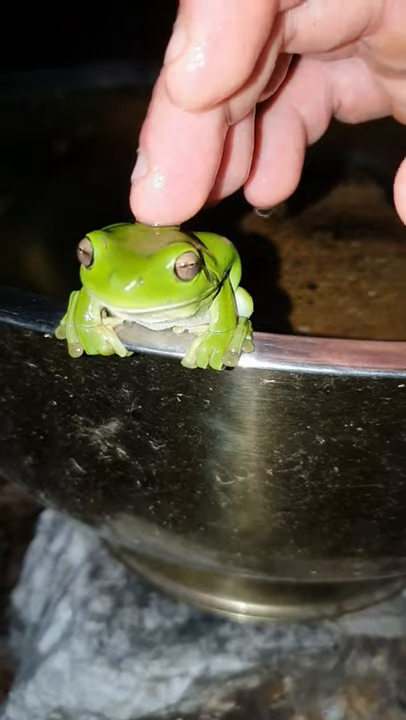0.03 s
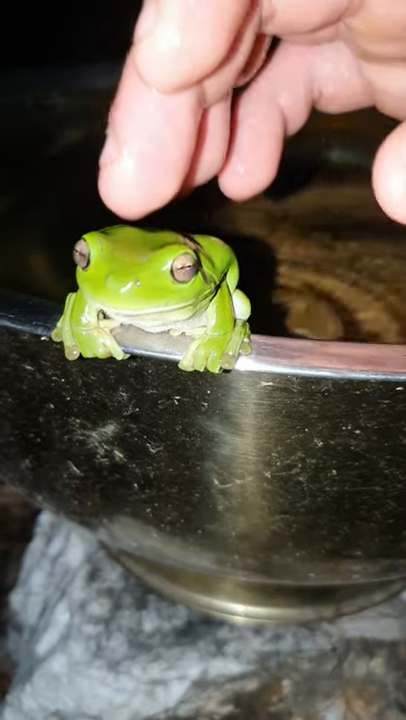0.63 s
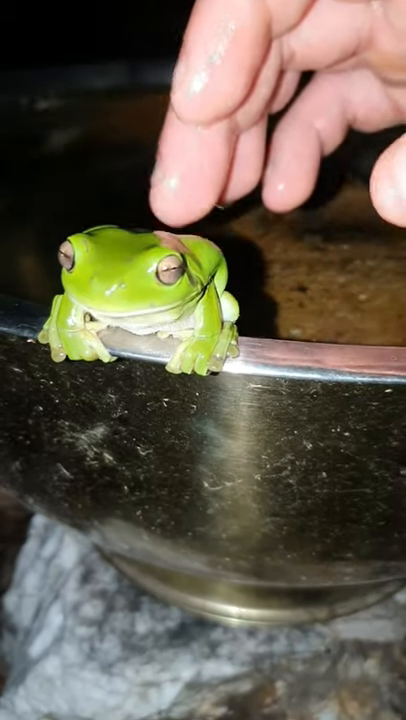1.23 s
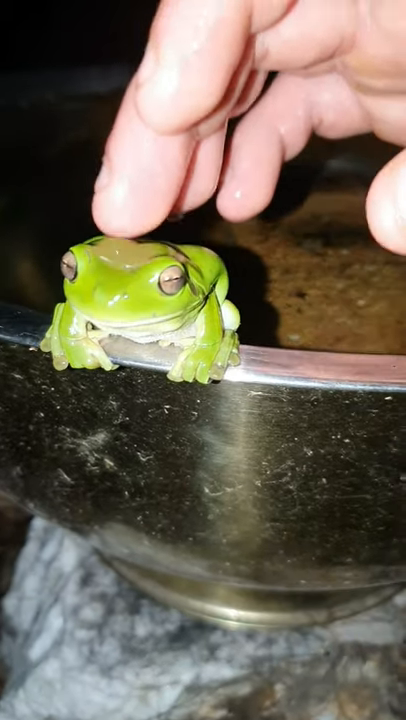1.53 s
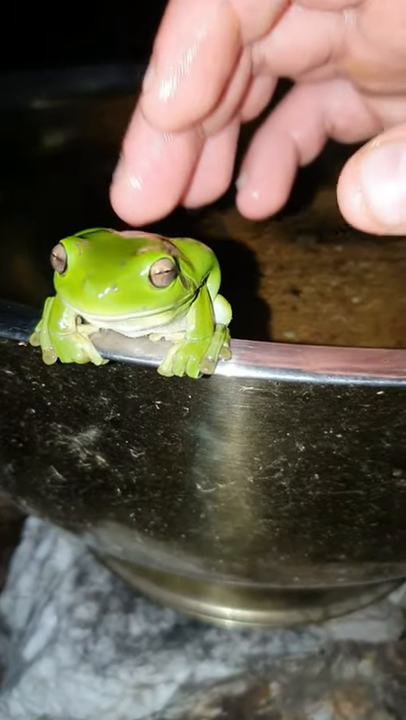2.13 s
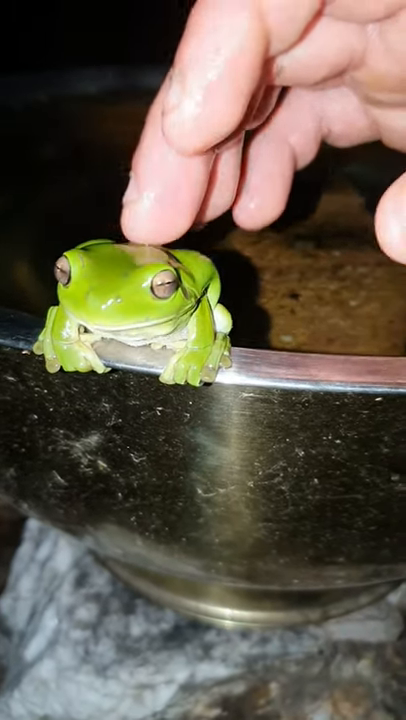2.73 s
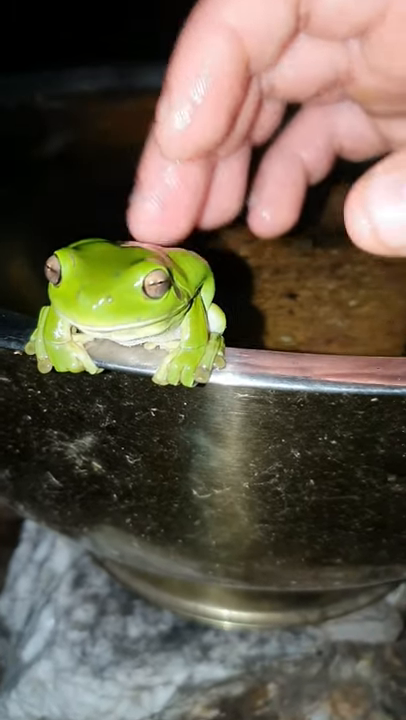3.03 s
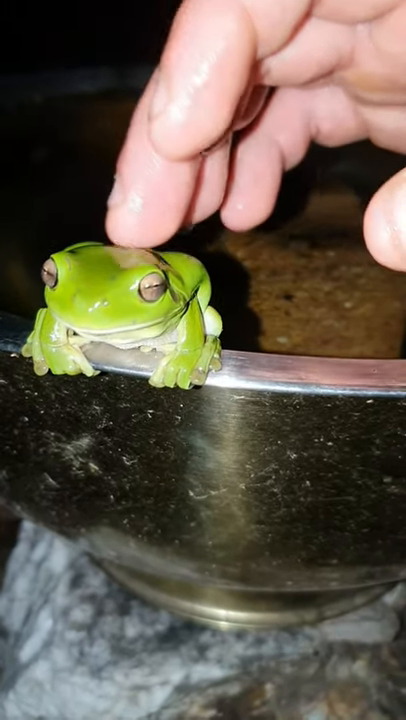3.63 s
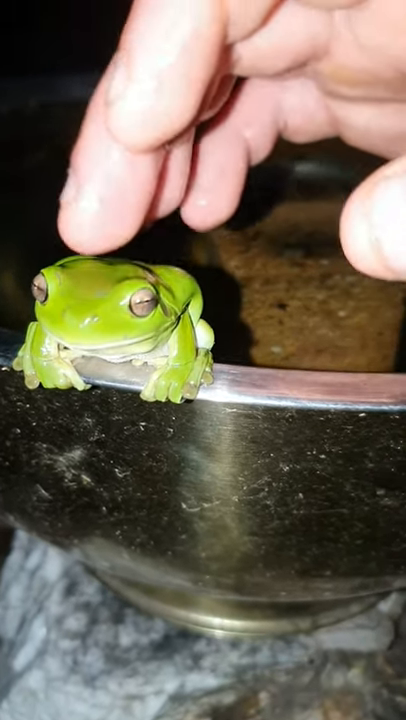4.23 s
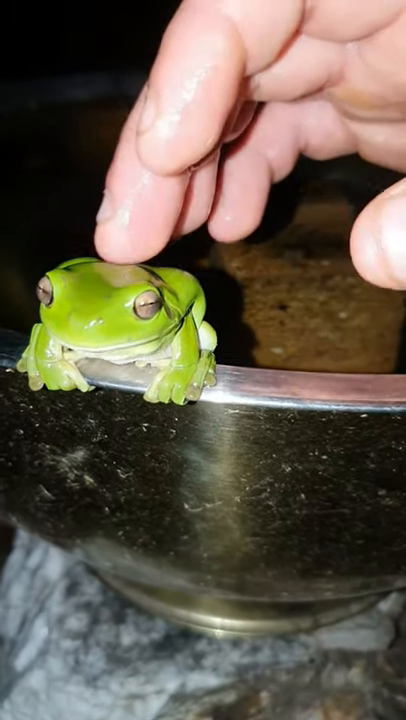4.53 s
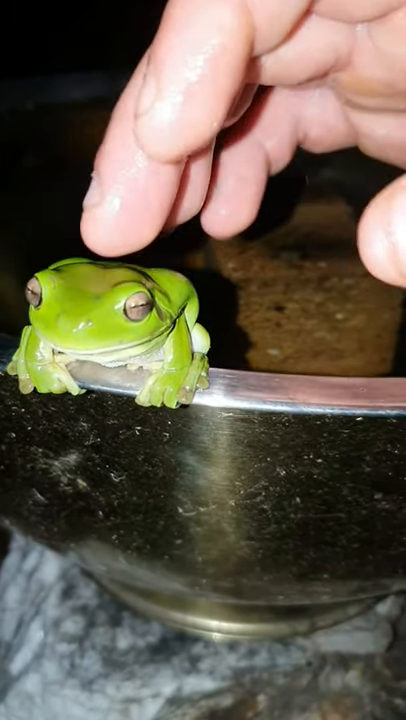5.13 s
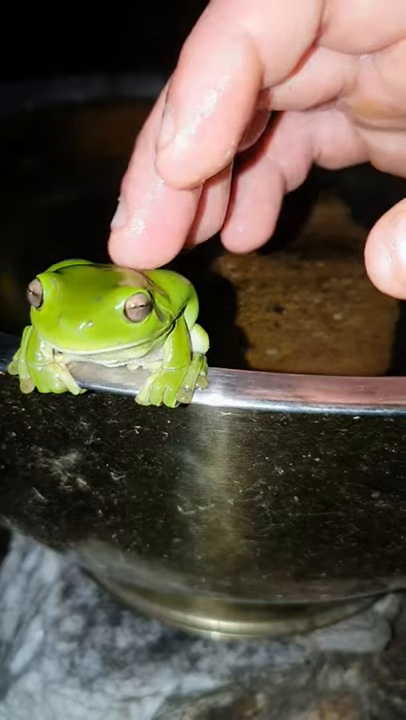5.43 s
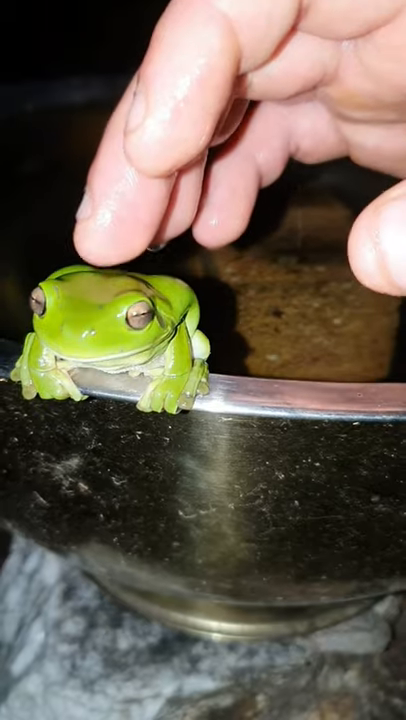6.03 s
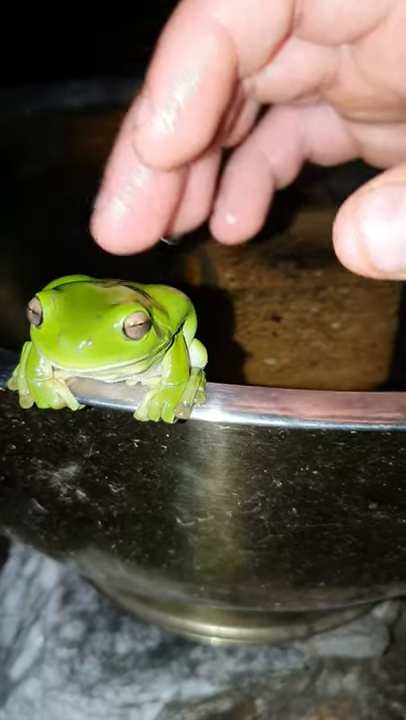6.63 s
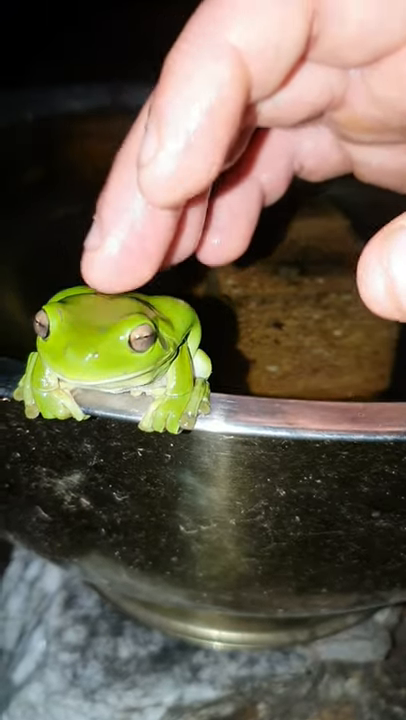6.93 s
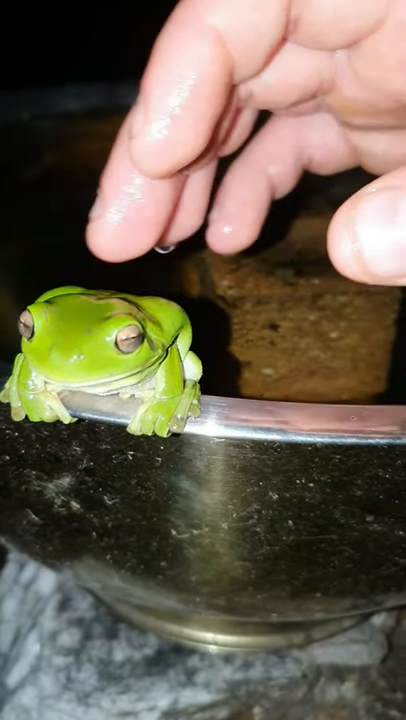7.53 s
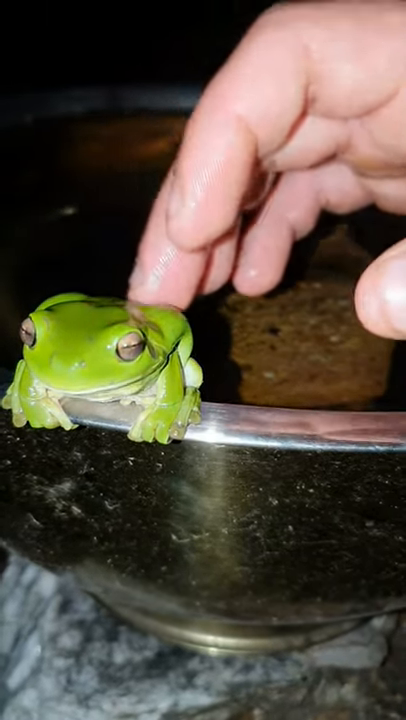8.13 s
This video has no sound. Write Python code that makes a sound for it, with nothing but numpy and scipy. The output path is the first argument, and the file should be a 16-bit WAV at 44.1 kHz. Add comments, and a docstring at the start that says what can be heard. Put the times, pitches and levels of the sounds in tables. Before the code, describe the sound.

Night crickets and a far insect chorus, with a distant machine's low rumble, dull microphone thuds and one brief wet swish.

```python
"""Field crickets chirp in a garden at night, each wing scrape making one tiny falling note.
A mole cricket churrs from its burrow and pauses once, and small crickets trill high above it.
Behind them are a far insect chorus, night air, a far road and a machine's hum and low rumble.
A hand bumps the microphone, shifts its grip, brushes lightly and makes one squeaky swish."""
import sys
import numpy as np
from scipy import signal
from scipy.fft import rfft, irfft
from scipy.io import wavfile

SR = 44100
rng = np.random.default_rng(int(sys.argv[2]) if len(sys.argv) > 2 else 0)


def to_wav(s):
    """Save 16-bit WAV."""
    ch = np.atleast_2d(s).T  # columns
    pcm = np.round(np.clip(ch, -1, 1) * 32767)  # PCM
    wavfile.write(sys.argv[1], SR, pcm.astype(np.int16))


N = 365588
T = np.arange(N) / SR
FREQS = np.fft.rfftfreq(N, 1 / SR)

# the tone of the far insect chorus: (frequency [Hz], relative level [dB])
CHORUS_TONE = [(3300, -15.5), (3600, -11), (3820, -2.5), (4150, 2.5), (4550, -0.5), (4750, -12),
               (5100, -15.5), (6500, -45.5), (7700, -23.5), (8200, -11.5), (8600, -16.5), (9200, -13),
               (9950, -14), (10300, -36), (12000, -35)]
# the tone of the night air: (frequency [Hz], relative level [dB])
AIR_TONE = [(250, 0), (450, 5.5), (600, -5), (780, -1), (1120, -5.5), (1350, -6), (2000, -2), (2270, -10),
            (2550, -6), (3200, -21), (6000, -21.5), (11000, -17.5), (12500, -28), (15000, -27)]
# the tone of the far road: (frequency [Hz], relative level [dB])
ROAD_TONE = [(580, -10.5), (720, -2), (850, -1.5), (1120, 0.5), (1350, -11), (1800, -13.5)]
# the road grows louder, unevenly: (time [s], level [dB])
ROAD_LOUDNESS = [(0, -85), (1.1, -72.5), (2.15, -74), (2.45, -70.5), (3.5, -68.5), (4, -72.5), (6.2, -68.5),
                 (6.9, -69), (7.35, -64.5), (7.7, -66.5), (7.9, -70), (8.29, -67)]
# the notes in the machine's hum: (pitch [Hz], level [dB])
HUM_NOTES = [(76.7, -51), (153.4, -67), (230.3, -68.5), (307.2, -76)]
# the hum's upper notes swell: (peak time [s], pitch [Hz], level [dB], half length [s])
OVERTONE_SWELLS = [(1.6, 307.2, -71, 0.3), (2.552, 234.1, -54, .11), (3.555, 307.2, -62.5, 0.32),
                   (6.3, 307.2, -66, 0.39), (6.96, 230, -59, 0.16)]
# the tone of the machine's rumble: (frequency [Hz], relative level [dB])
RUMBLE_TONE = [(12, -37), (20, -32.5), (60, -0.5), (81, 1), (112, -4), (177, -15.5), (237, -17.5),
               (279, -22.5), (313, -27), (360, -35.5), (420, -54), (550, -73), (920, -120)]
# how loud the rumble is: (time [s], level [dB])
RUMBLE_LOUDNESS = [(0, -43), (.8, -43), (1.05, -44.5), (1.55, -42), (1.85, -41), (2.02, -46.5), (2.25, -41),
                   (4.1, -43), (4.6, -43), (5.2, -44), (5.65, -41), (6.5, -43.5), (8.29, -42)]
# when the mole cricket sings: (start [s], end [s])
MOLE_PHRASES = [(0, 6.31), (7.25, 8.29)]
# how fast its wings move: (time [s], pace [strokes/s])
MOLE_PACE = [(0, 98), (1, 98.1), (2.5, 97.7), (4.8, 97.9), (6.3, 98.4), (8.29, 98.1)]
# how hard it sings: (time [s], level change [dB])
MOLE_EFFORT = [(0, -0.5), (1.6, 0), (2.6, 1.5), (3.5, 0.5), (3.9, -1.5), (6.3, 0), (7.3, -2.5), (7.8, 0.5),
               (8.29, -2)]
# its main note flares briefly: (time [s], boost [dB])
MOLE_FLARES = [(2.66, 8), (4.47, 4), (4.65, 6), (4.77, 8), (7.76, 4), (7.88, 8)]
# one high cricket's swelling trills: (start [s], end [s], relative full level [dB])
SWELLING_TRILLS = [(-2.5, 0.21, -76), (0.4, 2.26, -76), (2.5, 4.44, -75.5), (4.5, 6.6, -76.5), (7, 9, -76)]
# a second high cricket's short trills: (start [s], end [s])
SHORT_TRILLS = [(1.2, 1.65), (3.2, 3.8), (5.3, 5.3), (7.15, 7.5)]
# far crickets: (pitch [Hz], pace [strokes/s], level [dB], left minus right [dB])
FAR_CRICKETS = [(8800, 52, -84.5, -3), (9210, 118, -86, 3), (9300, 112, -88, 2)]
# the slow field cricket's chirps: (start [s], wing strokes [count], relative level [dB])
SLOW_SONG = [(.105, 7, -56.5), (.768, 7, -57), (1.381, 7, -56.5), (2.036, 7, -57), (2.754, 6, -56),
             (3.323, 7, -56.5), (4.042, 8, -58.5), (4.703, 10, -59.5), (5.417, 7, -58.5), (6.074, 7, -58),
             (6.751, 6, -58), (7.369, 7, -59), (8.114, 5, -56.5)]
# the quick field cricket's chirps: (start [s], relative level [dB])
QUICK_SONG = [(0.135, -58), (0.58, -59.5), (1.023, -56.5), (1.463, -58), (1.912, -57.5), (2.361, -56.5),
              (2.83, -56.5), (3.286, -55.5), (3.716, -58.5), (4.156, -59), (4.620, -58.5), (5.060, -57.5),
              (5.51, -60), (5.964, -58.5), (6.413, -58), (7.005, -59), (7.443, -57.5), (7.933, -59)]
# bumps on the left microphone opening: (time [s], level [dB], pitch [Hz])
MIC_BUMPS = [(0.774, -29.5, 62), (2.603, -21.5, 65), (2.81, -33, 62), (3.27, -26.5, 65),
             (3.51, -24.5, 79.6), (3.545, -17.5, 79.7), (3.715, -31, 60.1), (6.94, -31, 62)]
# light brushes of the hand: (peak time [s], level [dB], rise [s], fall [s],
# centre frequency [Hz], width [Hz], left minus right [dB])
HAND_BRUSHES = [(2.825, -69, 0.024, 0.024, 8900, 7000, -4), (4.82, -69.5, 0.018, .035, 3200, 2400, -4),
                (5.15, -76, .02, 0.062, 14000, 1800, 6), (5.715, -75.5, .018, .04, 13200, 3500, -5),
                (6.13, -76, 0.1, .08, 14300, 1400, 9), (6.275, -65, 0.074, .04, 13500, 2200, 6),
                (6.6, -74, .02, .04, 2500, 1000, -2), (6.85, -74, .02, .04, 2600, 1200, -2),
                (7.49, -72, 0.04, .05, 7500, 7000, -2), (7.738, -71, .012, 0.026, 13000, 3000, -4)]
# the tone of the swish: (frequency [Hz], relative level [dB])
SWISH_TONE = [(1500, -5), (2400, 0), (3100, -1.5), (4000, -1.5), (5000, -4.5), (6500, -2.5), (8600, -0.5),
              (12000, -4.5), (14500, -6.5)]


def undb(db):
    """Turn decibels into a number to multiply a sound by."""
    return 10 ** (np.asarray(db) / 20)


def unit(x):
    """Scale a signal so its average power is 1."""
    return x / np.sqrt(np.mean(x ** 2))


def curve(rows):
    """Join (time, value) points with straight lines."""
    return np.interp(T, *np.transpose(rows))


def held(start, end, rise_s, fall_s):
    """A loudness shape that rises to 1 at start, holds, and dies away after end."""
    return np.exp(-np.maximum(np.maximum((start - T) / rise_s, (T - end) / fall_s), 0))


def hill(peak_s, half_length_s):
    """A smooth rise and fall around one moment."""
    return np.exp(-((T - peak_s) / half_length_s) ** 2)


def pan(left_db):
    """Left and right gains that make the left side louder by left_db."""
    return undb(np.array([[left_db], [-left_db]]) / 2)


def wobble(rate):
    """A smooth random wobble of size about 1, changing about rate times a second."""
    return unit(irfft(rfft(rng.standard_normal(N)) * np.exp(-(FREQS / rate) ** 2), N))


def colour(points):
    """A gain for every frequency from (Hz, dB) points, fading out past both ends."""
    hz, db = np.transpose(points)
    edges = np.minimum(FREQS / hz[0], 1) ** 2 * np.minimum(hz[-1] / (FREQS + 1), 1) ** 4
    return undb(np.interp(np.log(FREQS + 1), np.log(hz), db)) * edges


def noise(gain, alike_hz=520):
    """Noise from all around; long waves, below alike_hz, reach both sides alike."""
    shared, apart = rfft(rng.standard_normal((2, N)))
    alike = 1 / (1 + (FREQS / alike_hz) ** 2)
    stereo = shared * np.sqrt(1 + alike) + np.array([[1], [-1]]) * apart * np.sqrt(1 - alike)
    return unit(irfft(gain * stereo, N))


def garden(x, echo_db, echo_s, left_db=0):
    """The direct sound plus echoes off leaves, ground and walls, which fade 60 dB in echo_s."""
    t = T[:SR // 2]
    echoes = rng.standard_normal((2, len(t))) * np.exp(-np.log(1000) * t / echo_s) * (t > .008)
    echoes *= undb(echo_db) / np.sqrt(np.sum(echoes ** 2, axis=1, keepdims=True))
    echoes[:, :1] = pan(left_db)  # the direct sound
    return signal.fftconvolve(x[None], echoes, axes=1)[:, :N]


def background():
    """Countless far insects blend into a shimmer above the night air and a far road."""
    shimmer_db = .5 * wobble(4) + .8 * wobble(35)
    chorus = noise(colour(CHORUS_TONE)) * undb(-65 + shimmer_db) * pan(-.15)
    flutter_db = .7 * wobble(9)
    air = noise(colour(AIR_TONE)) * undb(-67 + flutter_db)
    waver_db = .7 * wobble(8)
    road = noise(colour(ROAD_TONE), alike_hz=815) * undb(curve(ROAD_LOUDNESS) + waver_db)
    return chorus + air + road


def machine():
    """A distant machine hums inside a low rumble; its upper notes swell now and then."""
    clock = np.cumsum(1 + .00359 * wobble(3.88)) / SR  # uneven time makes the pitch waver
    hum = sum(undb(db + 3.63 * wobble(5.3)) * np.sin(2 * np.pi * hz * clock) for hz, db in HUM_NOTES)
    swells = sum(undb(db) * hill(peak, half_length) * np.sin(2 * np.pi * hz * clock)
                 for peak, hz, db, half_length in OVERTONE_SWELLS)
    rumble = noise(colour(RUMBLE_TONE), alike_hz=650) * undb(curve(RUMBLE_LOUDNESS) + .7 * wobble(7.4))
    return np.sqrt(2) * (hum + swells) + rumble


def trill(pitch_hz, stroke_hz, ring_share, fall_hz, wander, slip):
    """A run of scrapes; each restarts a falling note, out of step by about slip radians."""
    pace = stroke_hz * (1 + wander * wobble(10))
    strokes = np.cumsum(pace) / SR
    stroke_progress = strokes % 1
    offset = slip * rng.standard_normal(N // 50)[strokes.astype(int)]
    ring_progress = np.minimum(stroke_progress / ring_share, 1)  # silent once it reaches 1
    cycles = stroke_progress / pace * (pitch_hz + fall_hz * (1 - ring_progress) / 2)
    return unit(np.sin(np.pi * ring_progress) * np.sin(2 * np.pi * cycles + offset))


def mole_cricket():
    """Fast wing strokes make a low churr: a firm note ringing in the burrow, and an echoing rasp."""
    pace = curve(MOLE_PACE)
    note = trill(pitch_hz=1762, stroke_hz=pace, ring_share=.7, fall_hz=20, wander=.003, slip=.29)
    rasp = trill(pitch_hz=1752, stroke_hz=pace, ring_share=.5, fall_hz=220, wander=.008, slip=2.5)
    phrases = sum(held(start, end, rise_s=.02, fall_s=.13) for start, end in MOLE_PHRASES)
    effort = phrases * undb(curve(MOLE_EFFORT))
    burrow = np.exp(-((FREQS - 1735) / 170) ** 2)  # rings around 1735 Hz
    note = unit(irfft(rfft(note) * burrow, N))
    flutter_db = 1.6 * wobble(18) + sum(db * hill(peak, .023) for peak, db in MOLE_FLARES)
    note = garden(note * effort * undb(-71 + flutter_db), echo_db=-9, echo_s=.4, left_db=2)
    rasp = garden(rasp * effort * undb(-76), echo_db=6, echo_s=.5)
    return note + rasp * pan(.8)


def high_crickets():
    """Two small crickets rub their wings: one in long swelling trills, one in short ones."""
    first = trill(pitch_hz=7660, stroke_hz=99, ring_share=.42, fall_hz=560, wander=.03, slip=2.5)
    second = trill(pitch_hz=8270, stroke_hz=86.7, ring_share=.62, fall_hz=416, wander=.016, slip=2)
    swell_s, fade_s = .58, .045
    long_trills = 0
    for start, end, db in SWELLING_TRILLS:
        swell = 1 - np.exp(-(np.maximum(T - start, 0) / swell_s) ** 2)
        long_trills += undb(db) * swell * held(start, end, swell_s, fade_s)
    short_trills = sum(held(start, end, fade_s, fade_s) for start, end in SHORT_TRILLS)
    first *= long_trills * undb(-12.1 + 1.2 * wobble(6))
    second *= short_trills * undb(-89.5)
    return pan(3.1) * garden(first + second, echo_db=9, echo_s=.49)


def far_crickets():
    """High crickets further off never stop, and their echoes blur them together."""
    songs = 0
    for hz, pace, db, left_db in FAR_CRICKETS:
        song = trill(hz, pace, ring_share=.9, fall_hz=60, wander=.012, slip=1.8) * undb(wobble(2.4))
        songs += undb(db) * pan(left_db) * unit(garden(song, echo_db=9, echo_s=.33))
    return songs


def chirps(song, every_s, last_lag_s, note_s, pitch_hz, fall_hz, first_db, spread_db):
    """Each wing stroke is a short note that sags as the scraper slows; the last comes a bit late."""
    sound = np.zeros(N + SR)
    progress = T[:int(note_s * SR)] / note_s
    for start, count, db in song:
        for k, (pitch_luck, level_luck, time_luck) in enumerate(rng.standard_normal((count, 3))):
            hz = pitch_hz * (1 + .012 * pitch_luck) + fall_hz * (.5 - progress)
            note = np.sin(np.pi * progress) * np.sin(2 * np.pi * np.cumsum(hz) / SR)
            gain = undb(db + first_db / (1 + k) + spread_db * level_luck)  # a chirp starts softly
            middle = start + k * every_s + last_lag_s * (k == count - 1) + .00043 * time_luck
            i = max(int((middle - note_s / 2) * SR), 0)
            sound[i:i + len(note)] += gain * note
    return sound[:N]


def field_crickets():
    """Two crickets to the left: one with long slow chirps, a further one with quick, higher triplets."""
    slow = chirps(SLOW_SONG, every_s=.0463, last_lag_s=.003, note_s=.0115,
                  pitch_hz=4035, fall_hz=480, first_db=-4, spread_db=1.2)
    triplets = [(start, 3, db) for start, db in QUICK_SONG]
    quick = chirps(triplets, every_s=.038, last_lag_s=.004, note_s=.01,
                   pitch_hz=4445, fall_hz=580, first_db=-2.5, spread_db=.8)
    slow = garden(slow, echo_db=2.8, echo_s=.25, left_db=5)
    quick = garden(quick, echo_db=6.5, echo_s=.19, left_db=7)
    return undb(-.1) * slow + undb(-1.2) * quick


def bumps():
    """The hand bumps the left microphone opening, making soft, low thuds."""
    clock = np.cumsum(1 + .122 * wobble(41.4)) / SR  # uneven time makes the pitch waver
    thuds = sum(undb(db) * hill(peak, .012) * np.sin(2 * np.pi * hz * clock)
                for peak, db, hz in MIC_BUMPS)
    return thuds * np.array([[1], [.1]])


def grip():
    """The grip shifts once: the whole case shudders, and each microphone opening gets its own rumble."""
    shifting = held(2.62, 3.2, rise_s=.28, fall_s=.32)
    openings = undb(-42.5) * noise(colour([(30, -6), (55, 8.5), (90, -2.5), (160, -26)]), alike_hz=17)
    case = undb(-43.5) * noise(colour([(70, 6), (130, -2.5), (260, -20), (400, -35)]), alike_hz=905)
    return (openings + case) * shifting


def brushes():
    """Light brushes of the hand make short hisses."""
    hisses = 0
    for peak, db, rise, fall, hz, width, left_db in HAND_BRUSHES:
        hiss = noise(np.exp(-2 * ((FREQS - hz) / width) ** 2))
        hisses += undb(db) * pan(left_db) * held(peak, peak, rise, fall) * hiss
    return hisses


def swish():
    """One louder, wet swish on the right squeaks in quick slips and trails off all around."""
    end_s, left_db = 7.694, -3
    stroke = held(7.671, end_s, rise_s=.008, fall_s=.012) * pan(left_db)
    tail = undb(-2) * held(end_s, end_s, rise_s=.008, fall_s=.058)
    hiss = undb(-57.3) * (stroke + tail) * noise(colour(SWISH_TONE))
    slips = trill(pitch_hz=8900, stroke_hz=170, ring_share=.9, fall_hz=430, wander=.1, slip=2.5)
    squeak = undb(-61.5) * held(7.668, end_s, rise_s=.0041, fall_s=.006) * slips
    return hiss + garden(squeak, echo_db=-10, echo_s=.25, left_db=left_db)


def scene():
    """Add up the crickets, the distant sounds and the hand."""
    crickets = field_crickets() + mole_cricket() + high_crickets() + far_crickets()
    distance = background() + machine()
    handling = grip() + bumps()
    rubbing = (brushes() + swish()) * undb(1.8 * wobble(200))  # a fast flicker sounds grainy
    return crickets + distance + handling + rubbing


def record(dry):
    """The recorder cuts off the treble above 14500 Hz."""
    return signal.sosfilt(signal.ellip(10, .2, 70, 14500, fs=SR, output="sos"), dry)


dry = scene()
out = record(dry)
to_wav(out)
```